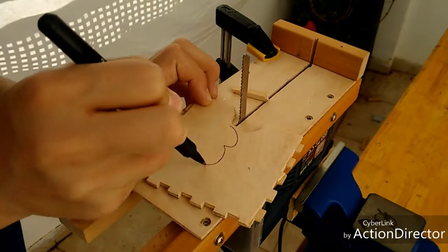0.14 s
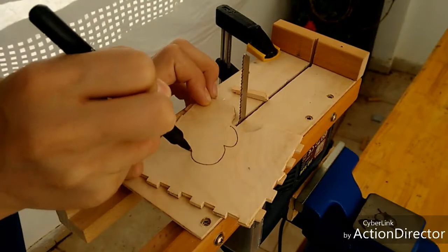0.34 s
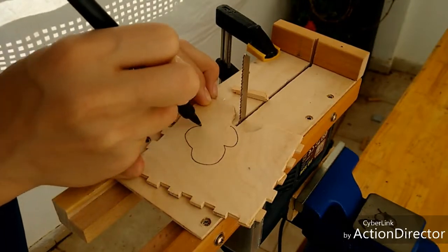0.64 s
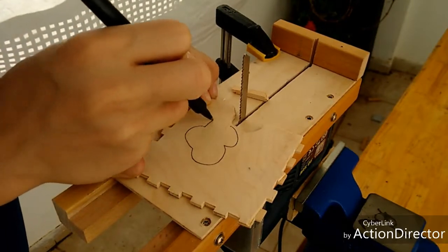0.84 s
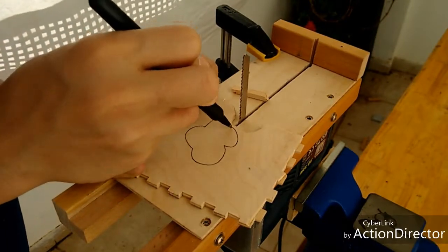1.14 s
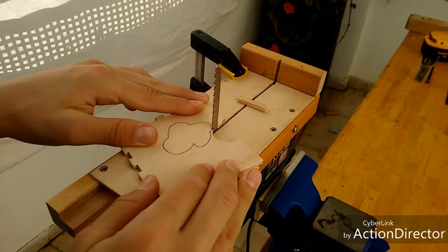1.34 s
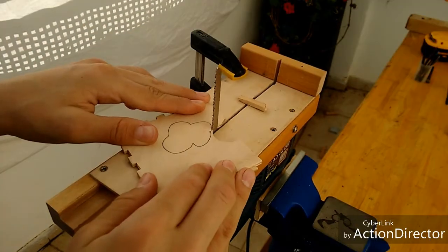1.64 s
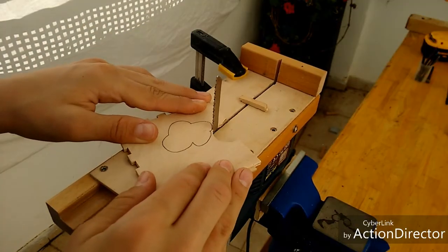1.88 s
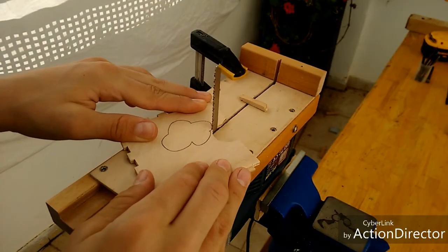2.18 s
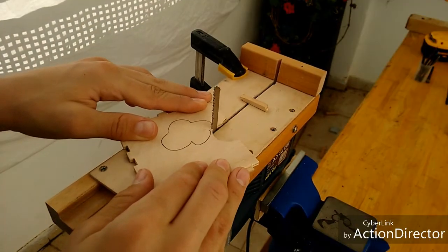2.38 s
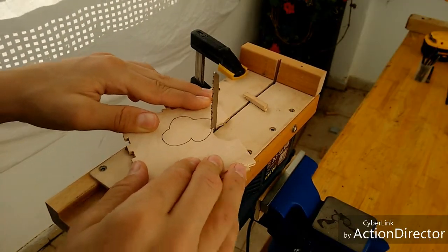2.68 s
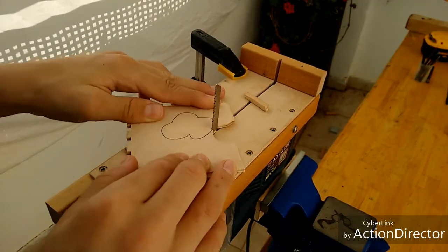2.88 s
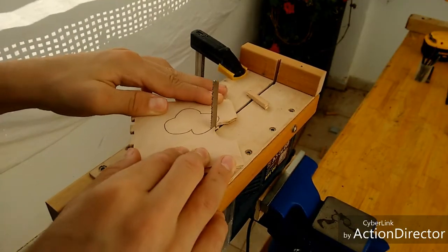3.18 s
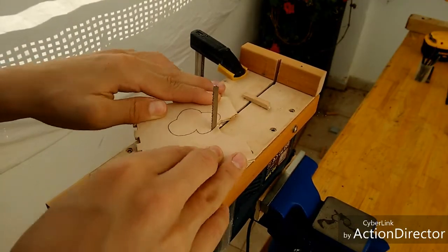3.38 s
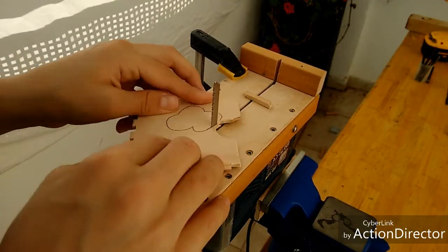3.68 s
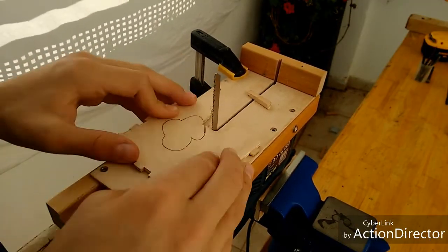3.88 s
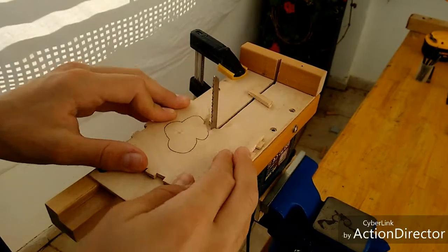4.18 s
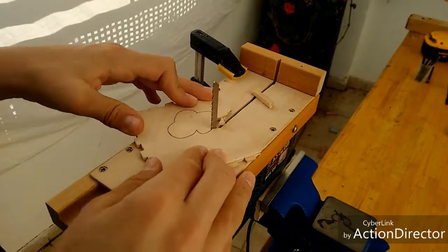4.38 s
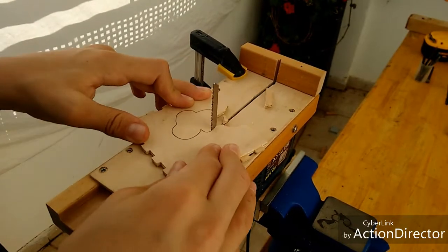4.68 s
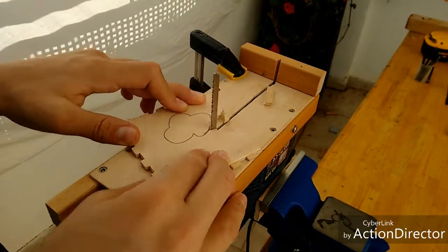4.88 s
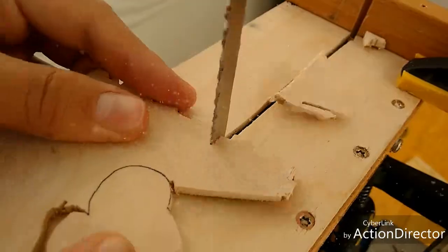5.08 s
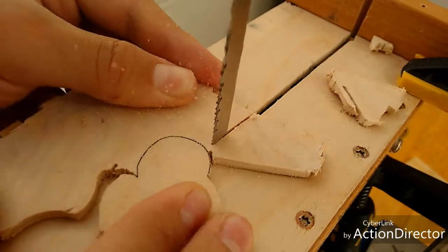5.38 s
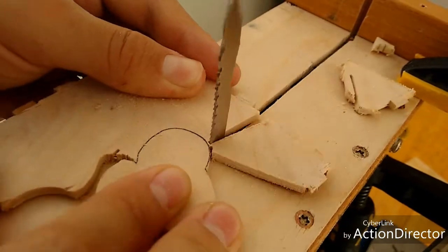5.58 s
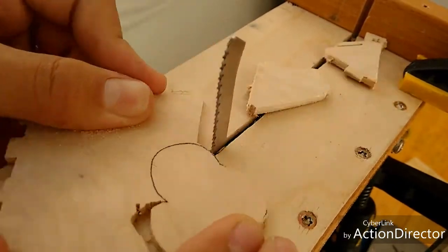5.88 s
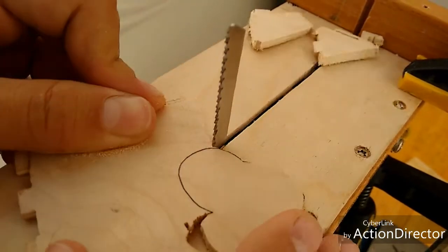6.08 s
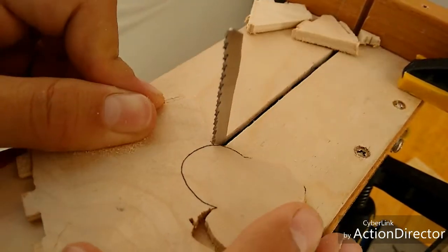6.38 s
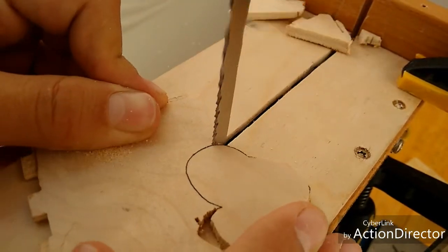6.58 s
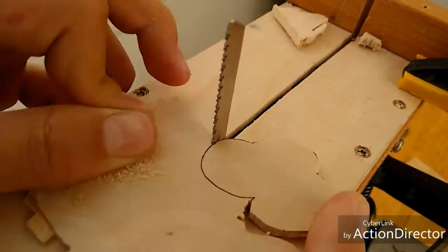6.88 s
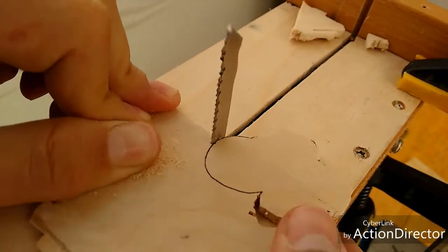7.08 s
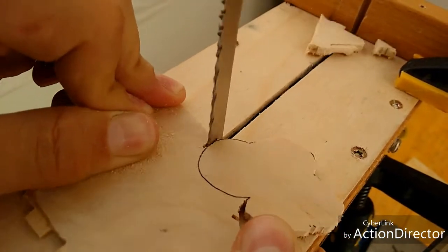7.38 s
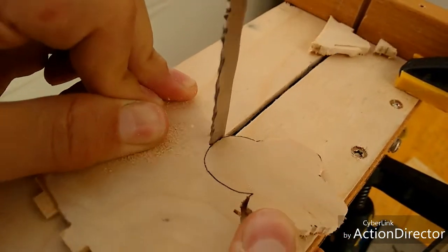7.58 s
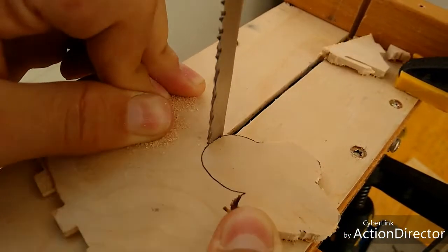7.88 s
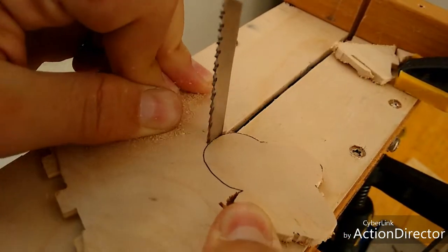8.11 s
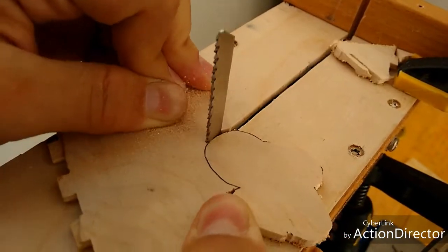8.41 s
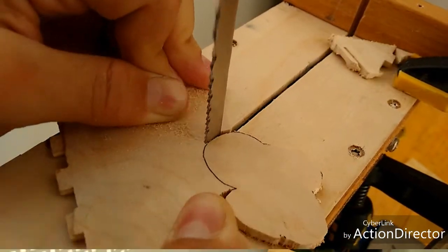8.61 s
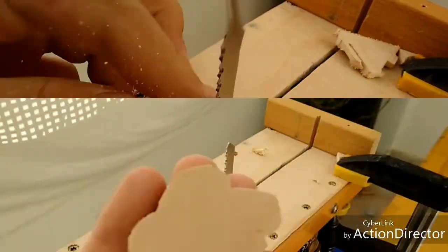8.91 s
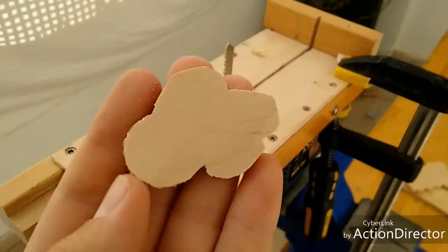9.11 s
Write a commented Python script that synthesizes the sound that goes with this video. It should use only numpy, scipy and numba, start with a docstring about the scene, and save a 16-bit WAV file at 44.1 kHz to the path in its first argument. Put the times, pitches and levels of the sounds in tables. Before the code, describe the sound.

From 0 to 1.26 seconds, a quiet workshop with soft airy hiss; a felt pen gives tiny high squeaks and dry ticks on wood, mostly around 0.1 to 0.4, 0.8 and 1.0. At 1.26 a jigsaw bursts in much louder, at natural speed: a woody, hollow rattle of about 23 strokes a second, steady until 2.5. Then it cuts straight to time-lapse sawing, quieter, thin, bright and hissy, the strokes merged into a buzzing pitch that dips near 3.5, climbs to its highest around 4.0, and slides down to 5.0. From 5.0 to 8.95 the sawing is closer, louder and rougher, with a ringing midrange that shifts as the wood turns, pitch sagging and recovering. Hard crackling pops hit the microphone at 5.0-5.3, around 6.9, 7.4, 7.8 and 8.8-8.9. At 8.95 it stops, leaving low, faint room noise until 9.3.

```python
"""In a quiet workshop a felt pen draws on wood, squeaking by stick-slip and ticking on the grain. Then a jigsaw
fixed blade-up under a plywood table saws in three abutting stretches: at natural speed, then twice in time-lapse
at several times the stroke rate. Pulse trains of tooth bites and gearbox knocks, with torn noise, excite the table
and blade resonances under a rotor whine; in the last stretch the piece turns and hard strokes pop in the two
ports of a close microphone. The workshop is left alone at the end."""
import sys
import numpy as np
from scipy import signal
from scipy.fft import rfft, irfft, next_fast_len
from scipy.io import wavfile
from scipy.ndimage import uniform_filter1d
from numba import njit

SR = 44100
rng = np.random.default_rng(int(sys.argv[2]) if len(sys.argv) > 2 else 0)


def put_to_file(sound):
    """Save the sound as 16-bit audio at rate SR, in the file named by the first command-line argument."""
    columns = np.atleast_2d(sound).T  # one column per channel
    safe = np.clip(columns, -1, 1)
    whole_steps = np.round(safe * 32767)
    wavfile.write(sys.argv[1], SR, whole_steps.astype(np.int16))


N = 407925
OPPOSED = np.array([[1], [-1]])  # left and right port in opposite phase


def undb(db):
    """Amplitude ratio: twenty decibels to a factor of ten."""
    return 10 ** (np.asarray(db) / 20)


def level(x, db):
    """Root-mean-square normalisation to a level in dB."""
    return x * undb(db) / np.sqrt(np.mean(x ** 2))


def curve_at(t, table):
    """Linear interpolation of a two-column table of times and values."""
    return np.interp(t, *np.transpose(table))


def walk(n, rate):
    """Slow random modulation: values held for 1 / rate seconds and slewed twice, with a spread near 1."""
    hold = max(int(SR / rate), 1)
    steps = np.repeat(rng.standard_normal(n // hold + 1), hold)
    return 1.81 * uniform_filter1d(uniform_filter1d(steps, hold), hold)[:n]


def colour(x, shape, ring=(), lo_hz=0., hi_hz=1e6, factor=0.89):
    """Minimum-phase filtering: spectrum points, resonances and band limits; a complex factor scales and turns."""
    n = 2 * next_fast_len(len(x) // 2 + 2048)
    hz = np.maximum(np.fft.rfftfreq(n, 1 / SR), 1.)
    shape_hz, shape_db = np.transpose(shape)
    db = np.interp(np.log(hz), np.log(shape_hz), shape_db)
    db = db + sum(lift_db / (1 + (2 * (hz - f) / width) ** 2) for f, width, lift_db in ring)
    db = db - 10 * np.log10((1 + (lo_hz / hz) ** 8) * (1 + (hz / hi_hz) ** 8))
    # folding the cepstrum onto positive time makes the filter causal
    cepstrum = irfft(np.maximum(db, -120) * np.log(10) / 20, n)
    cepstrum[1:n // 2] *= 2
    cepstrum[n // 2 + 1:] = 0
    return irfft(rfft(x, n) * np.exp(rfft(cepstrum)) * factor, n)[:len(x)]


def clicks(n, at, size):
    """Band-limited impulses: windowed sinc pulses at fractional sample places."""
    out = np.zeros(n + 16)
    keep = (at > 0) & (at < n - 1)
    at, size = at[keep], size[keep]
    whole = np.floor(at)
    for k in range(-4, 5):
        d = whole + k - at
        pulse = np.sinc(d) * np.cos(np.pi * d / 10) ** 2
        np.add.at(out, whole.astype(int) + k + 8, size * pulse)
    return out[8:n + 8]


# Spectra of the quiet workshop: brighter hiss behind the pen, darker rumble under the time-lapse sawing and at
# the end. Each row: frequency in Hz, relative dB per Hz.
SHOP_PEN_SPECTRUM = [(18, -66), (30, -34), (108, -12.5), (853, -9), (1300, -7.5), (1820, -7.5),
                     (2190, -6.5), (4920, -14.5), (5610, -20), (7480, -22), (8520, -34), (15600, -27.5)]
SHOP_SPECTRUM = [(18, -52), (30, -17.5), (156, -18.5), (506, -13.5), (923, -16.5), (1080, -23),
                 (1170, -18.5), (1300, -25.5), (2190, -36.5), (12300, -47.5), (13600, -38.5),
                 (15600, -42.5)]


def shop(t0, t1, spectrum, db, apart):
    """Diffuse background: room air and far machines as coloured noise, partly opposed between the ports."""
    i0, i1 = int(t0 * SR), min(int(t1 * SR), N)
    n = i1 - i0
    mid, side = (colour(rng.standard_normal(n), spectrum) * undb(0.99 * walk(n, 13.0)) for _ in range(2))
    out = np.zeros((2, N))
    out[:, i0:i1] = level(mid + apart * side * OPPOSED, db)
    return out


# Pen squeaks. Each row: start in seconds, length in seconds, first and last frequency in Hz, amplitude in dB.
SQUEAKS = [(.13, 0.02, 2970, 2930, -43), (.13, 0.054, 2150, 2060, -45), (.152, .01, 2950, 2950, -47),
           (.135, .025, 5900, 6170, -55), (.225, 0.082, 2550, 2800, -39.5), (.4, 0.034, 2350, 2300, -48),
           (.83, 0.035, 4400, 4900, -47), (.85, 0.056, 1780, 1970, -45), (.99, 0.052, 2830, 2760, -47),
           (.98, 0.11, 7140, 7300, -53), (1.06, 0.11, 7400, 7000, -53)]
FAINT_LOWEST_DB, FAINT_LOW_HZ, FAINT_HIGH_HZ, FAINT_MEAN_S = -60, 1540, 4860, 0.038
FAINT_STARTS_WITHIN_S = 1.2


def pen_squeaks():
    """Stick-slip friction: the felt tip slips in short tones whose pitch and level waver."""
    out = np.zeros(N)
    place, span, height, strength = rng.random((30, 4)).T
    low_hz = FAINT_LOW_HZ * (FAINT_HIGH_HZ / FAINT_LOW_HZ) ** height ** 2
    faint = zip(FAINT_STARTS_WITHIN_S * place, FAINT_MEAN_S * (.5 + span), low_hz,
                low_hz * (.97 + 0.064 * span), FAINT_LOWEST_DB + 6 * strength)
    for s, length, from_hz, to_hz, db in [*SQUEAKS, *faint]:
        n = int(length * SR)
        hz = np.linspace(from_hz, to_hz, n) + 45 * walk(n, 286)
        tone = np.sin(2 * np.pi * np.cumsum(hz) / SR)
        out[int(s * SR):][:n] += undb(db + 2.0 * walk(n, 210)) * np.hanning(n) ** 0.19 * tone
    return out


# Pen ticks. Each row: start in seconds, relative strength in dB, ringing frequency in Hz.
TICKS = [(0.215, -36, 4180), (0.24, -36, 2750), (0.245, -34, 2730), (0.267, -32, 2970), (0.76, -31, 3750),
         (1.052, -32.5, 3770), (1.06, -42, 5540)]


def pen_ticks():
    """Impact excitation: the tip ticks on the grain as a damped tone with a shorter noisy scrape."""
    out = np.zeros(N)
    t = np.arange(500) / SR
    scrape_band = signal.butter(2, (2500, 6500), "band", fs=SR)
    for s, db, hz in TICKS:
        scrape = level(signal.lfilter(*scrape_band, rng.standard_normal(500)), -6)
        tone = 0.65 * np.exp(-t / 0.0057) * np.sin(2 * np.pi * hz * t)
        out[int(s * SR):][:500] += undb(db) * (tone + np.exp(-t / 0.0022) * scrape)
    return out


# How unevenly the teeth meet the wood. Each row: time in seconds, spread as a share of a stroke.
UNEVEN = [(1.26, .0013), (2.5, .0013), (2.55, .006), (2.9, .013), (5.0, .013), (5.02, .005), (5.55, .005),
          (5.8, .01), (8.95, .015)]
TEETH_PER_STROKE = 20.3


def tooth_bites(t, phase, back_db, jitter, scatter_db):
    """Periodic impact excitation: teeth click on both half strokes; also returns each half's random strength."""
    n = len(t)
    halves = np.arange(int(2 * phase[-1]) + 2)[:, None]
    place = .25 + np.arange(-4, 5) / TEETH_PER_STROKE
    early, tooth_db = rng.standard_normal((2, len(halves), len(place)))
    strength = rng.standard_normal((len(halves), 1))
    # each tooth is a little early or late, and keeps that habit for some strokes
    habit = [walk(n, 3)[::n // len(halves)][:len(halves)] for _ in range(2 * len(place))]
    habit = np.array(habit).T
    habit = np.where(halves % 2, habit[:, ::2], habit[:, 1::2])
    uneven = curve_at(np.interp(halves / 2, phase, t), UNEVEN)
    turns = halves / 2 + place + jitter * early + uneven * habit
    at = np.interp(turns, phase, np.arange(n), left=-1, right=-1)
    stroke_db = scatter_db * strength + halves % 2 * back_db[at.clip(0).astype(int)]
    # the bite is hardest in the middle of each half stroke
    size = np.sin(2 * np.pi * place) ** 2 * undb(stroke_db + tooth_db)
    size = size * (1 - 2 * (halves % 2))  # the return stroke pulls the other way
    return level(clicks(n, at.ravel(), size.ravel()), 0), strength[:, 0]


RATTLE_LAG, RATTLE_WANDER, RATTLE_DB = .22, .04, -7  # lag and its wander in strokes; level against the knock


def gearbox_knocks(phase, strength):
    """Backlash impacts: the gearbox knocks once a stroke, then rattles back."""
    n = len(phase)
    hit_db = strength[::2]
    hit = np.arange(len(hit_db)) + .25
    lag = RATTLE_LAG + RATTLE_WANDER * walk(n, 3)[::n // len(hit)][:len(hit)]
    at = np.interp(np.r_[hit, hit + lag], phase, np.arange(n), left=-1, right=-1)
    rattle_db = RATTLE_DB + rng.standard_normal(len(hit))
    return level(clicks(n, at, undb(np.r_[hit_db, rattle_db])), 0)


# Overtones of the rotor whine. Each row: multiple of the rotor's turns, relative level in dB.
WHINE = [(1, -4), (2, -8.5), (3, 11)]
ROTOR_TURNS_PER_STROKE = 7.
LOAD_DB, SPEED_DB_PER_OCTAVE = 8, 18


def rotor_whine(phase, hz, load, ring, rotor_db):
    """Harmonic radiation locked to rotation, louder with speed and while the stroke rate is being dragged down."""
    turns = ROTOR_TURNS_PER_STROKE * phase
    whine = sum(undb(db + 2 * walk(len(hz), 8.7)) * np.sin(2 * np.pi * k * turns) for k, db in WHINE)
    whine_db = rotor_db + LOAD_DB * load + SPEED_DB_PER_OCTAVE * np.log2(hz / hz.max())
    return undb(whine_db) * colour(whine, [(20, 0), (20000, 0.0011)], ring)


# How much weaker the return stroke bites. Each row: time in seconds, level against the forward stroke in dB.
RETURN_BITE = [(1.26, -3), (1.36, -1.5), (1.45, -6), (1.75, -6), (2.05, -5), (2.2, -1.5), (2.5, -4),
               (5.0, -4.5), (5.03, -16), (5.19, -13), (5.24, -3), (5.4, -4), (5.55, -9), (5.8, -3),
               (5.95, -10), (6.15, -3), (6.8, -3), (6.86, -10), (7.0, -3), (7.6, -3), (7.72, -14),
               (7.98, -12), (8.05, -3), (8.72, -2), (8.78, -13)]
# How far the lowest growl stands above the thump. Each row: time in seconds, difference in dB.
GROWL = [(1.26, -1), (2.5, -6.5), (2.55, -10), (3.3, 1.5), (3.6, 4), (4.2, -1.5), (5.0, 1), (5.3, -5.5),
         (5.6, -9.5), (6.1, -10), (6.8, -6), (7.3, -14.5), (7.5, -15), (7.75, -10.5), (7.9, -17.5),
         (8.05, -13.5), (8.18, -7), (8.26, -12.5), (8.41, -14), (8.55, -15), (8.65, -18), (8.95, 3)]
# How far separate strokes stand out of the even rasp. Each row: time in seconds, contrast in dB before load.
CHATTER = [(1.26, 0), (2.5, 0), (2.52, -1), (5.0, -1), (5.04, 7), (5.3, 6), (5.5, 4), (5.7, -4), (5.95, 1),
           (6.2, -4), (6.72, -4), (6.85, 3), (7.15, 2), (7.3, -1), (7.62, -3), (7.73, 8), (7.85, 5),
           (8.1, 4), (8.25, -2), (8.7, -4), (8.77, 6), (8.95, 6)]
CHATTER_LOAD_DB, LOAD_SAG_PER_S = 2.5, .4
THUMP_LAG_S = 0.37  # the thump shares the bite's swings quicker than this


def saw(table, rate, mid, side, ring, edges_hz, thump, hiss, start, jitter, scatter_db, rough, steady,
        flicker_db, rotor_db, knock_db, side_db, loose, pan_db, turned=False):
    """Source-filter principle: bites, knocks and torn noise, band by band, excite the table and blade."""
    s, *columns = np.transpose(table)
    i0, i1 = int(s[0] * SR), int(s[-1] * SR)
    n = i1 - i0
    t = (i0 + np.arange(n)) / SR
    bite_db, ring_db = (np.interp(t, s, c) for c in columns)
    hz, back_db = curve_at(t, rate), curve_at(t, RETURN_BITE)
    thump_db = curve_at(t, thump) - uniform_filter1d(bite_db, int(THUMP_LAG_S * SR))
    growl_db = thump_db + curve_at(t, GROWL)
    # chip hiss follows a share of the ring's swings
    hiss_db = hiss[0] + hiss[1] * (ring_db - ring_db.mean())
    # load is positive while the stroke rate sags
    rate_growth = np.gradient(np.log(hz)) * SR
    load = np.tanh(-uniform_filter1d(rate_growth, SR // 20) / LOAD_SAG_PER_S)
    phase = start + np.cumsum(hz) / SR
    teeth, strength = tooth_bites(t, phase, back_db, jitter, scatter_db)
    knock = gearbox_knocks(phase, strength)
    bite = level(teeth + undb(knock_db) * knock, 0)
    # chips tear in the stroke rhythm, over the even roar of motor and fan
    gate = np.sin(2 * np.pi * phase) ** 4 * undb(back_db * (phase % 1 > .5))
    crisp = undb(curve_at(t, CHATTER) + CHATTER_LOAD_DB * load)
    out = rotor_whine(phase, hz, load, ring, rotor_db)
    # from low to high: growl, thump, bite, ring, hiss; levels relative to the bite
    bands = zip((0., *edges_hz), (*edges_hz, 1e6), (growl_db, thump_db, 0 * hz, ring_db, hiss_db),
                (knock, knock, bite, teeth, teeth), rough, steady)
    for lo, hi, rel_db, pulses, share, roar in bands:
        swing = roar / crisp + gate
        swing = swing / np.sqrt(uniform_filter1d(swing ** 2, SR // 10))
        tear, other = swing * rng.standard_normal((2, n))
        share = share / (share + (1 - share) * crisp)
        drive = np.sqrt(1 - share) * pulses + np.sqrt(share) * tear
        both = colour(drive, mid, ring, lo, hi)
        both = turning(both, t) if turned else both
        # the opposed part is a quarter turn out of phase and partly independent
        loosened = np.sqrt(1 - loose) * drive + np.sqrt(loose) * other
        apart = colour(loosened, side, (), lo, hi, 1j)
        scale = undb(bite_db + rel_db + flicker_db * walk(n, 24.605)) / both.std()
        out = out + scale * (both + undb(side_db) * apart * OPPOSED)
    sound = np.zeros((2, N))
    sound[:, i0:i1] = out * signal.windows.tukey(n, 200 / n) * undb(pan_db * OPPOSED / 2)
    return sound


# Bite of the teeth at natural speed. Each row: time in seconds, bite in dB, blade ring above the bite in dB.
SLOW_BITE = [(1.261, -17.5, -8.5), (1.28, -16.5, -8), (1.3, -19, -7.5), (1.4, -21.5, -6), (1.6, -18.5, -6),
             (2.2, -20.5, -5), (2.511, -21.5, -2.5)]
# Stroke rate. Each row: time in seconds, strokes per second.
SLOW_RATE = [(1.261, 23.27), (2.511, 22.47)]
# Colour common to both ports and opposed between them. Each row: frequency in Hz, relative dB per Hz.
SLOW_MID = [(24, -53), (40, -63), (154, -30), (241, -30.5), (320, -4.5), (428, -8.5), (654, -4.5), (905, 2),
            (1020, -1.5), (1350, -9.5), (2390, -35.5), (3150, -31), (4810, -35.5), (7200, -36.5),
            (8500, -33), (9800, -38.5), (13400, -38), (15600, -50.5)]
SLOW_SIDE = [(24, -91), (40, -56), (287, -7), (428, 5), (654, -5), (905, 2), (1080, -1.5), (1770, -4),
             (3390, -18.5), (12100, -24), (15600, -25.5)]
# Table and blade resonances. Each row: frequency in Hz, width in Hz, lift in dB.
SLOW_RING = [(439, 24, 4), (474, 20, 4.5), (565, 20, 8), (883, 24, 6), (927, 26, 5), (1085, 30, 4.5),
             (1340, 110, 7)]
# Table thump. Each row: time in seconds, level in dB before the bite's quick swings.
SLOW_THUMP = [(1.261, -45.5), (1.4, -47.5), (2.511, -40)]


# In the stretches: jitter in strokes; rough = noise share and steady = roar against tearing, both from growl to
# hiss; hiss = dB against the bite and share of the ring's swings followed; loose = independent opposed noise.
def slow_sawing():
    """Separable impacts: at natural speed the single strokes can be heard apart."""
    return saw(SLOW_BITE, SLOW_RATE, SLOW_MID, SLOW_SIDE, SLOW_RING, edges_hz=(125., 270., 2000., 6000.),
               thump=SLOW_THUMP, hiss=(-12.5, .8), start=0.86, jitter=.001, scatter_db=.7, flicker_db=.5,
               rough=(.7, .6, .16, .85, .95), steady=(4.1, 3.5, 7.6, 2.1, 2.9), rotor_db=-54.5,
               knock_db=-31.0, side_db=-15.5, loose=.25, pan_db=1.5)


# Bite in the first time-lapse. Each row: time in seconds, bite in dB, blade ring above the bite in dB.
FAST_BITE = [(2.51, -29.5, 4.5), (2.86, -28, 4.5), (2.91, -35.5, 1.5), (2.96, -28, 3.5), (3.0, -31, 8.5),
             (3.24, -25.5, 5.5), (3.29, -27.5, 8.5), (3.43, -26, 3.5), (3.53, -25.5, 1.5),
             (3.63, -32.5, -1), (3.68, -26.5, 2.5), (3.81, -31.5, 4.5), (3.94, -24.5, 3.5),
             (3.99, -32.5, 7.5), (4.19, -30, 11), (4.28, -30, 0), (4.46, -30, 10), (4.49, -28, 1.5),
             (4.6, -24.5, 5.5), (4.65, -26.5, 3), (4.94, -26.5, -1), (4.97, -36, 8), (5.01, -24, -3.5)]
# Stroke rate, sagging when the blade binds. Each row: time in seconds, strokes per second.
FAST_RATE = [(2.51, 173.8), (2.55, 177), (2.63, 176), (2.8, 164.1), (2.86, 149), (2.98, 176.8), (3.07, 179),
             (3.16, 174.3), (3.24, 164.4), (3.41, 139.8), (3.47, 124.4), (3.53, 127.8), (3.57, 120.7),
             (3.66, 135), (3.71, 158.8), (3.76, 166.7), (3.8, 167.2), (3.91, 189.1), (4.051, 195.6),
             (4.09, 191.8), (4.23, 166.1), (4.35, 185), (4.4, 190.5), (4.47, 188.1), (4.68, 137.5),
             (4.81, 126.5), (4.86, 116.2), (4.93, 109.7), (4.96, 108.8), (5.01, 100.7)]
# Colour common to both ports and opposed between them. Each row: frequency in Hz, relative dB per Hz.
FAST_MID = [(59, -77.5), (100, -62), (223, -36), (412, -48), (743, -19.5), (826, -20), (978, -1),
            (1090, -16), (1230, -11), (1620, -23.5), (2930, -9.5), (3400, -11.5), (5410, -9), (7580, -4),
            (15600, -8)]
FAST_SIDE = [(59, -83), (100, -63), (809, -21.5), (1210, 6.5), (2050, -22.5), (2700, -7.5), (4670, -3.5),
             (7910, -16), (9770, -31), (12300, 4), (15600, -3)]
# Table and blade resonances. Each row: frequency in Hz, width in Hz, lift in dB.
FAST_RING = [(990, 45, 4.4), (1210, 104, 12.4), (3010, 35, 10.4), (3630, 83, 2), (4580, 300, 3.4),
             (7410, 140, 6.8), (7670, 51, 4), (8480, 48, 7.7), (8860, 64, 2)]
# Table thump. Each row: time in seconds, level in dB before the bite's quick swings.
FAST_THUMP = [(2.52, -47), (3.04, -51), (3.17, -52.5), (3.31, -55), (3.42, -46), (3.44, -49.5),
              (4.04, -52.5), (4.071, -59), (4.191, -52), (4.23, -54), (4.249, -55), (4.43, -52.5),
              (4.52, -53.5), (5.0, -47)]


def fast_sawing():
    """Fusion of impacts: in time-lapse the strokes come fast enough to merge into a pitch."""
    return saw(FAST_BITE, FAST_RATE, FAST_MID, FAST_SIDE, FAST_RING, edges_hz=(650., 1750., 5500., 9500.),
               thump=FAST_THUMP, hiss=(-2.5, .4), start=0., jitter=.0007, scatter_db=1.5, flicker_db=1.2,
               rough=(.3, .15, .36, .26, .45), steady=(1.137, 1.2, 2.9, 3.0, 1.0), rotor_db=-52.5,
               knock_db=-30.5, side_db=-14.0, loose=.45, pan_db=-0.5)


@njit
def lift(x, hz, width, gain):
    """Moving resonance: a state-variable band-pass with a gliding centre, added to the sound."""
    y, band, low = np.empty(len(x)), 0., 0.
    for i in range(len(x)):
        g, k = np.tan(np.pi * hz[i] / SR), width / hz[i]
        v = (band + g * (x[i] - low)) / (1 + g * (g + k))
        band, low = 2 * v - band, low + 2 * g * v
        y[i] = x[i] + (gain[i] - 1) * k * v
    return y


# Resonances that shift as the piece turns. Each row: time in seconds, sheet in Hz, blade in Hz, blade lift in dB.
TURNING = [(5.01, 2700, 4140, 5.5), (5.07, 3050, 4200, 3.5), (5.25, 3200, 4200, 3), (5.33, 3440, 4120, 9),
           (5.45, 2840, 4210, 4.5), (5.56, 2880, 4300, 10.5), (5.7, 2900, 4200, 4),
           (5.94, 3330, 4240, -0.5), (6.2, 3300, 4220, 3.5), (6.5, 3400, 4170, 4), (6.69, 3100, 4030, 7.5),
           (6.83, 3370, 4180, 9), (6.92, 3340, 4190, 4), (7.25, 2980, 4230, 3.5), (7.45, 3317, 4230, -2),
           (7.66, 3400, 4250, 5.5), (8.0, 3443, 4330, 5), (8.22, 3321, 4127, 8), (8.31, 2932, 4293, 3),
           (8.43, 3416, 4300, 9.5), (8.65, 3554, 4280, 3.5), (8.78, 3400, 4303, 7), (8.95, 3270, 4210, 6)]
# How strongly the table top sings along. Each row: time in seconds, lift in dB.
SINGING = [(5.01, 22), (5.04, 13.5), (5.07, 0), (5.22, 14.5), (5.36, 22), (5.43, 1), (5.75, 9),
           (5.85, 14.5), (6.15, 14), (6.7, 9), (6.83, 4), (6.9, -2), (7.12, 1), (7.17, 7), (7.24, 11),
           (7.45, -2), (7.66, 10.5), (7.95, 5), (8.03, 5), (8.17, 9), (8.24, 0.5), (8.4, 8.5), (8.55, 2.5),
           (8.65, 8.5), (8.85, 6.5)]
SING_HZ, SING_WIDTH_HZ, SHEET_WIDTH_HZ, SHEET_DB, BLADE_WIDTH_HZ = 1497, 30., 520., 5, 180.


def turning(x, t):
    """Time-varying modes: sheet and blade ring higher or lower, blade and table top more or less."""
    s, sheet_hz, blade_hz, blade_db = np.transpose(TURNING)
    x = lift(x, np.interp(t, s, sheet_hz), SHEET_WIDTH_HZ, undb(SHEET_DB + 0 * t))
    x = lift(x, np.interp(t, s, blade_hz), BLADE_WIDTH_HZ, undb(np.interp(t, s, blade_db)))
    return lift(x, SING_HZ + 0 * t, SING_WIDTH_HZ, undb(curve_at(t, SINGING)))


# Bite while the piece turns. Each row: time in seconds, bite in dB, blade ring above the bite in dB.
CURVE_BITE = [(5.01, -24, -3), (5.03, -16.5, 1.5), (5.09, -18, 0.5), (5.2, -20.5, 2.5), (5.38, -21.5, 4.5),
              (5.42, -18.5, 1), (5.565, -21.5, 0.5), (5.59, -28, -2.5), (5.64, -20, -1), (5.9, -21.5, 3.5),
              (5.96, -23.5, 2), (6.05, -23, 2), (6.13, -27.5, 2), (6.17, -20, 1), (6.65, -18, -1.5),
              (6.79, -20, 0), (6.81, -26, 7.5), (6.85, -15.5, -1), (6.89, -31, 0), (6.95, -30, 2),
              (7.02, -28.5, 0.5), (7.12, -30, 2.5), (7.16, -24, 0), (7.3, -22, 2.5), (7.33, -22, 3.5),
              (7.38, -22, 2), (7.42, -24.5, 3), (7.43, -35.5, 2), (7.65, -23.5, 4), (7.71, -22, 3),
              (7.78, -22, 3.5), (7.87, -27.5, 2), (7.99, -24, 4.5), (8.02, -18, 3), (8.08, -21.5, 1),
              (8.17, -22, 1.5), (8.2, -29, 4), (8.36, -22, 2), (8.59, -29.5, 5), (8.62, -20.5, 1.5),
              (8.77, -22.5, 6.5), (8.87, -30.5, 5), (8.93, -23, 4.5), (8.95, -32.5, 0)]
# Stroke rate, sagging when the blade binds. Each row: time in seconds, strokes per second.
CURVE_RATE = [(5.01, 150.6), (5.12, 146), (5.14, 141.7), (5.38, 133.9), (5.8, 147.1), (6.08, 152.5),
              (6.73, 146.2), (6.83, 144.9), (6.86, 136.7), (6.91, 145.8), (6.97, 135.6), (7.01, 139.2),
              (7.19, 135.6), (7.32, 137.0), (7.37, 135.3), (7.42, 125.7), (7.47, 137.8), (7.57, 142.3),
              (7.74, 138.5), (7.8, 130.4), (7.82, 134.3), (7.86, 127.1), (7.99, 129), (8.14, 119.9),
              (8.2, 121.7), (8.25, 130.3), (8.31, 135.8), (8.41, 139.4), (8.62, 138), (8.71, 132.1),
              (8.78, 118.3), (8.89, 135.8), (8.92, 140.8), (8.95, 132.7)]
# Colour common to both ports and opposed between them. Each row: frequency in Hz, relative dB per Hz.
CURVE_MID = [(59, -76), (100, -33.5), (403, -13.5), (438, -4.5), (530, -8), (602, -12), (826, -5),
             (1260, 6.5), (1460, 7.5), (2140, -1), (2550, -2.5), (2800, -1.5), (3400, -0.5), (4290, 1),
             (8430, -13.5), (13400, -15.5), (15600, -13)]
CURVE_SIDE = [(59, -113), (100, -3.5), (542, 4), (1160, 19), (2750, 6), (4290, 3), (4970, -40), (5530, -4),
              (6540, 5), (8200, 6.5), (10200, -0.5), (15600, -6)]
# Table and blade resonances. Each row: frequency in Hz, width in Hz, lift in dB.
CURVE_RING = [(2780, 55, 4.8), (3510, 940, 5.15), (6470, 410, 5.1)]
# Table thump. Each row: time in seconds, level in dB before the bite's quick swings.
CURVE_THUMP = [(5.021, -52), (5.2, -39), (5.47, -44), (5.638, -37.5), (5.86, -33), (6.48, -36),
               (6.74, -40.5), (6.89, -40), (7.1, -37), (7.16, -33.5), (7.26, -34.5), (7.39, -30.5),
               (7.61, -38), (7.79, -30), (7.95, -26), (8.39, -38.5), (8.61, -30.5), (8.79, -29.5),
               (8.909, -43), (8.939, -45)]


def curve_sawing():
    """Impacts through moving resonances: time-lapse strokes in a piece that turns."""
    return saw(CURVE_BITE, CURVE_RATE, CURVE_MID, CURVE_SIDE, CURVE_RING, edges_hz=(850., 2200., 3800., 7500.),
               thump=CURVE_THUMP, hiss=(-6, .6), start=0.22, jitter=.001, scatter_db=1.8, flicker_db=.9,
               rough=(.22, .24, .14, .25, .6), steady=(5.9, 6.13, 2.3, 2.4, 3.5), rotor_db=-66.5,
               knock_db=-11.5, side_db=-15.0, loose=.6, pan_db=0.46, turned=True)


# The loudest pops. Each row: time in seconds, relative strength in dB, share of slow swell against sharp dip
# (negative swells the other way, limited to -1..1).
LOUD_POPS = [(5.043, -1.5, 0.88), (5.077, -1, -0.14), (5.132, 3, 0.74), (5.147, -3, -0.43),
             (5.18, 6.5, 0.62), (5.195, -13, .2), (5.2177, -2, 1), (5.2304, -1, -0.62), (5.239, -8, -0.6),
             (5.259, -2, 1), (5.2695, 3, 0.86), (5.2811, -1, -0.27), (5.362, -7, -0.033),
             (6.855, -1, 0.033), (6.8678, 2, 0.5), (6.877, -5, -0.039), (6.9674, 5.5, 0.47),
             (6.9751, 0, 0.082), (7.0607, -0.5, 0.21), (7.4053, -0.5, 0.81), (7.4185, -5, -0.22),
             (7.795, 0, 0.67), (7.803, -2.5, 0.18), (8.7743, 0, -1.24), (8.784, 2.5, 0.93),
             (8.792, 6, 0.81), (8.8169, 0, -0.81), (8.8864, -2, 0.73), (8.909, 0.5, 0.2),
             (8.9167, 0, -0.63), (8.924, 0, 0.55), (8.931, 7, 0.67), (8.938, 3, 0.48)]
# Spells in which every stroke gives at least a faint pop. Each row: start in seconds, end in seconds.
JOLTING = [(5.0975, 5.255), (6.8635, 6.87), (7.0678, 7.07), (7.3975, 7.42), (7.8102, 7.82), (8.7662, 8.836)]
FAINT_POP_DB, FAINT_SCATTER_DB, POP_LEAK_HZ = -11, 6, 108.6


def pops():
    """Pressure pulses: a short dip at the left port and a rise at the right, each with a slower swell."""
    loud_s, loud_db, loud_swell = np.transpose(LOUD_POPS)
    strokes = np.concatenate([np.arange(a, b, 1 / curve_at(a, CURVE_RATE)) for a, b in JOLTING])
    # a faint pop gives way to a loud one within 3 ms
    faint_s = strokes[np.abs(strokes[:, None] - loud_s).min(axis=1) > .003]
    swell_chance, level_chance = rng.standard_normal((2, len(faint_s)))
    at = np.r_[loud_s, faint_s] * SR - 13  # the dip's centre comes 13 samples on
    swell = np.r_[loud_swell, np.tanh(swell_chance)].clip(-1, 1)
    size = undb(np.r_[loud_db, FAINT_POP_DB + FAINT_SCATTER_DB * level_chance])
    sharp = clicks(N, at, size * (1 - np.abs(swell)))
    slow = clicks(N, at, size * swell)
    t = np.arange(300) / SR
    dip = np.exp(-((t - .0003) / 0.000093) ** 2)
    back = (1 - np.exp(-(t / 0.00058) ** 4)) * np.exp(-t / 0.0006) * 1.2
    push = np.convolve(sharp, dip) - np.convolve(slow, back)
    push = signal.lfilter(*signal.butter(1, POP_LEAK_HZ, "high", fs=SR), push)  # the pressure leaks away
    # the jolt itself cracks in both ports
    crack = np.convolve(sharp, np.exp(-t / 0.002))[:N] * rng.standard_normal(N)
    left, right = -1.2 * push[:N], 0.91 * np.roll(push, 4)[:N]  # right port a little later
    return undb(-16.0) * crack + np.array([left, right])


def scene():
    """Superposition: workshop, pen, three stretches of sawing and pops are summed."""
    room = shop(0, 1.261, SHOP_PEN_SPECTRUM, -45.5, 0.61)
    room += shop(2.511, 8.95, SHOP_SPECTRUM, -63.0, 0.97)
    room += shop(8.94, 9.3, SHOP_SPECTRUM, -46, 0.7)
    pen = pen_squeaks() + pen_ticks()
    sawing = slow_sawing() + fast_sawing() + curve_sawing()
    return room + pen + sawing + pops()


TOP_HZ = 15350


def record(dry):
    """Saturation and band limiting: peaks are clipped at 0.95, then a steep low-pass cuts the top."""
    low_pass = signal.ellip(10, .2, 70, TOP_HZ, fs=SR, output="sos")
    return signal.sosfilt(low_pass, np.clip(dry, -.95, .95))


dry = scene()
out = record(dry)
put_to_file(out)
```